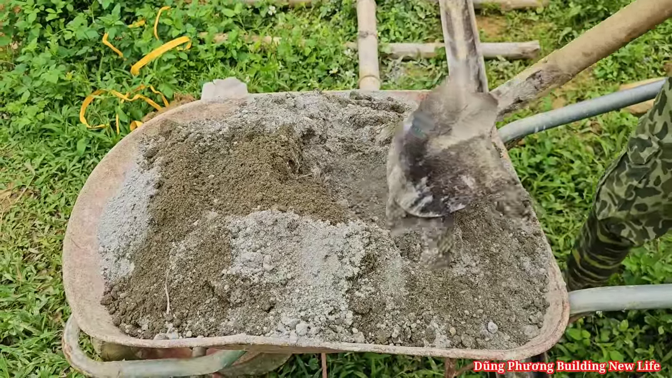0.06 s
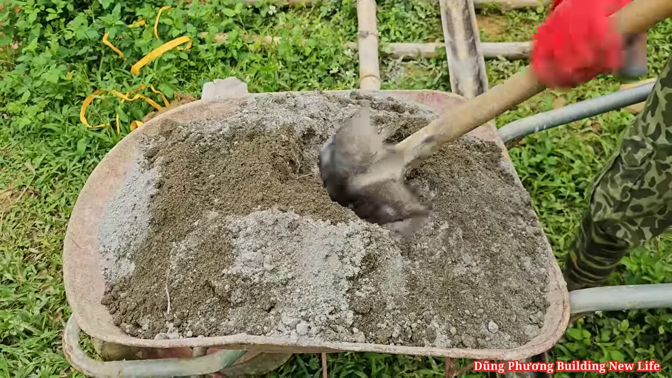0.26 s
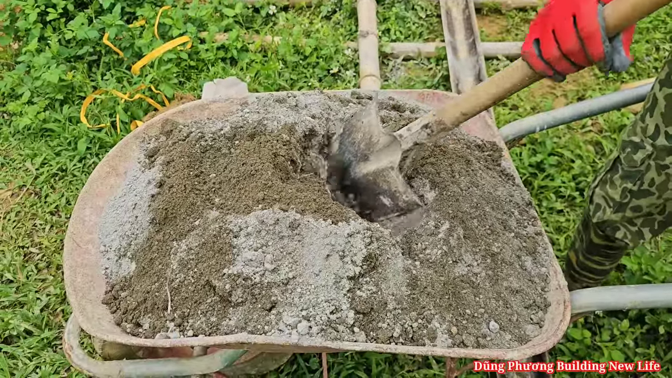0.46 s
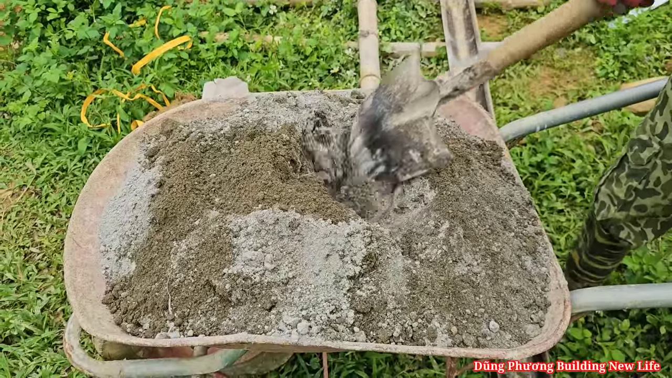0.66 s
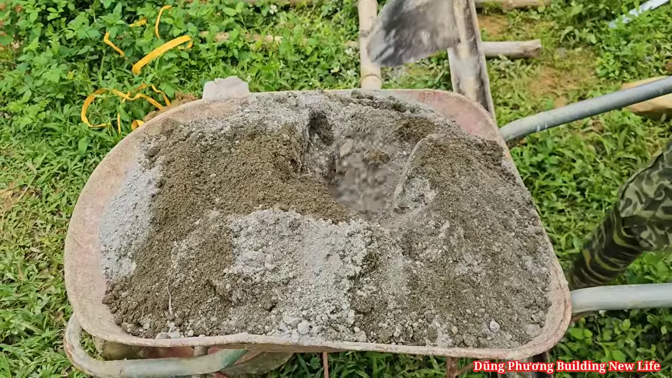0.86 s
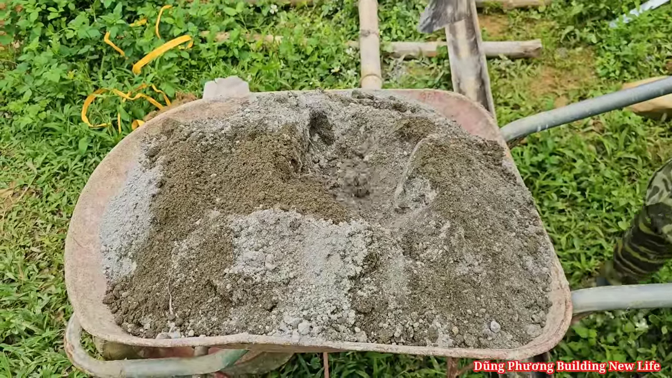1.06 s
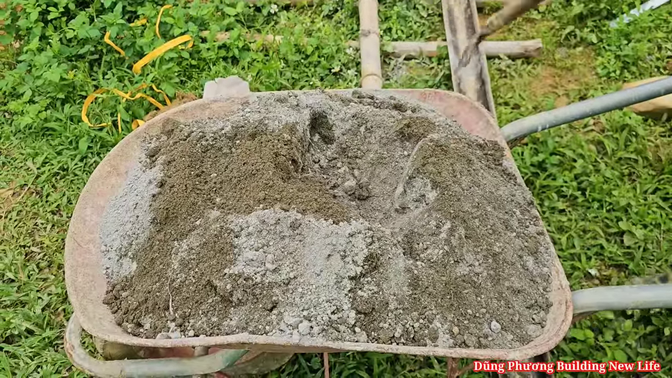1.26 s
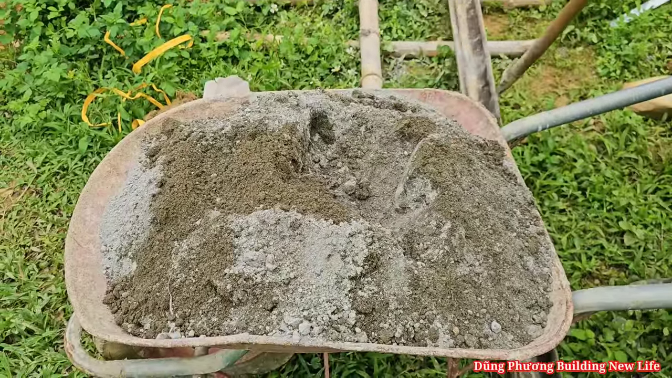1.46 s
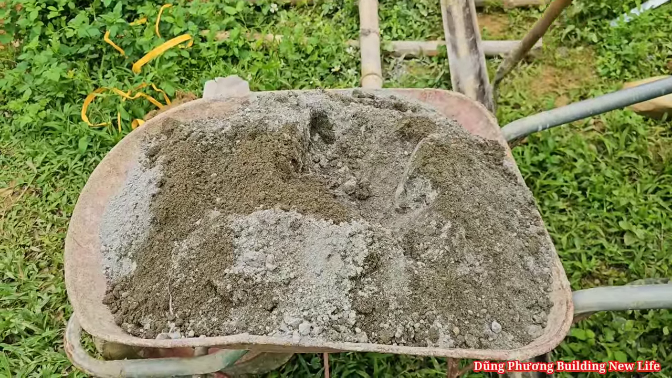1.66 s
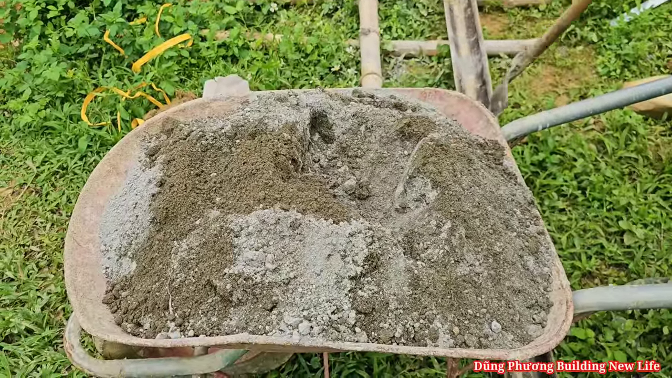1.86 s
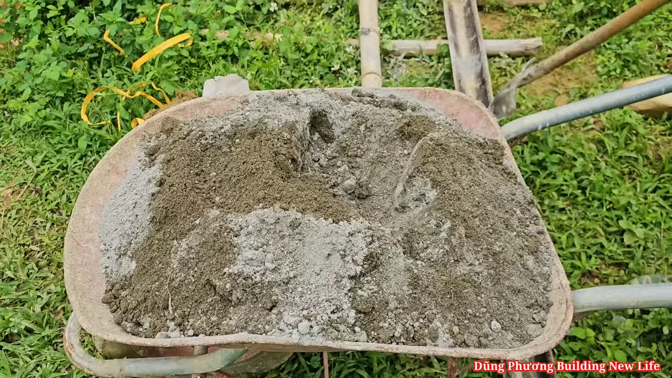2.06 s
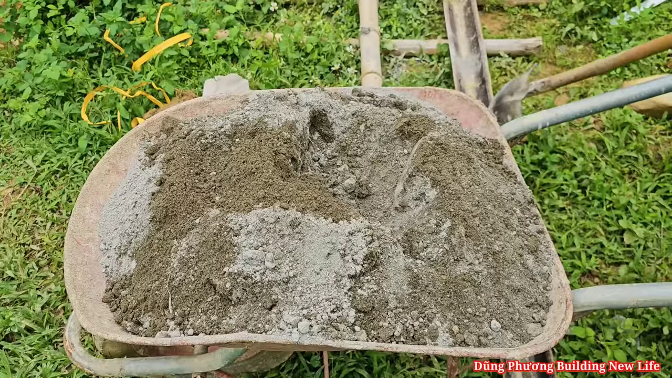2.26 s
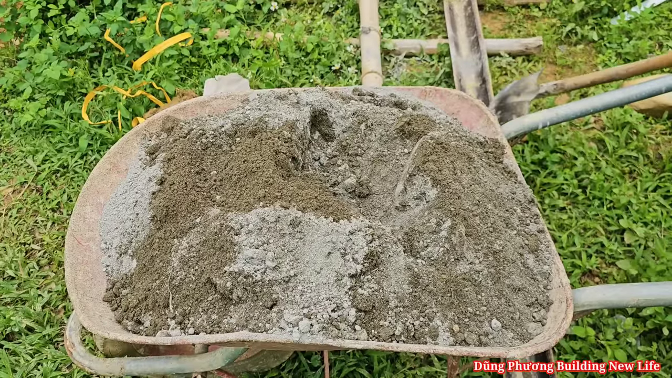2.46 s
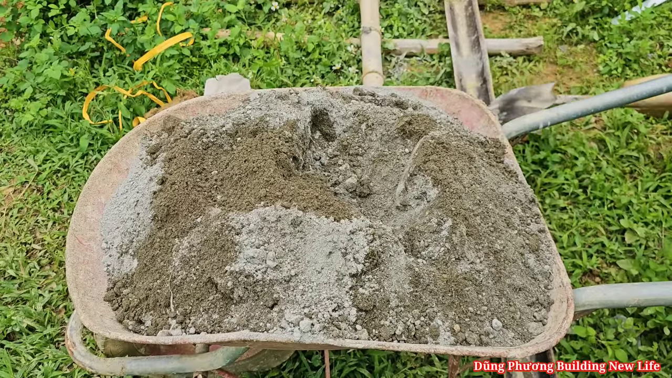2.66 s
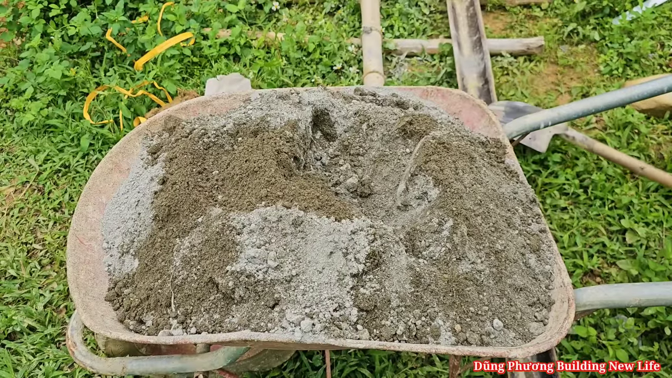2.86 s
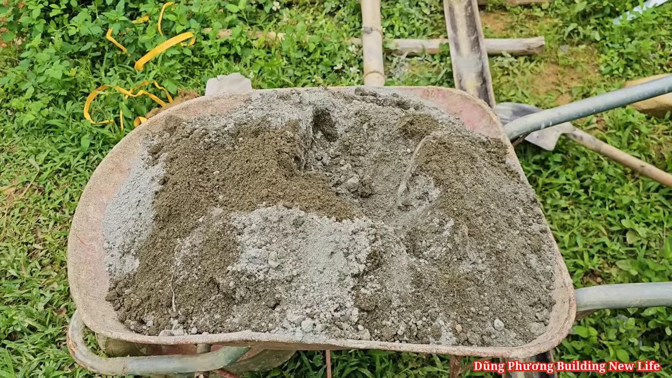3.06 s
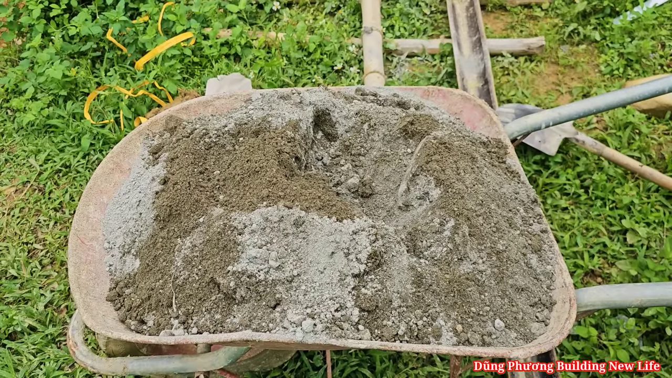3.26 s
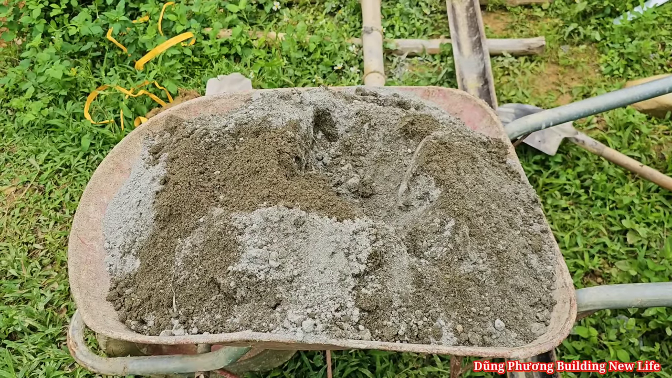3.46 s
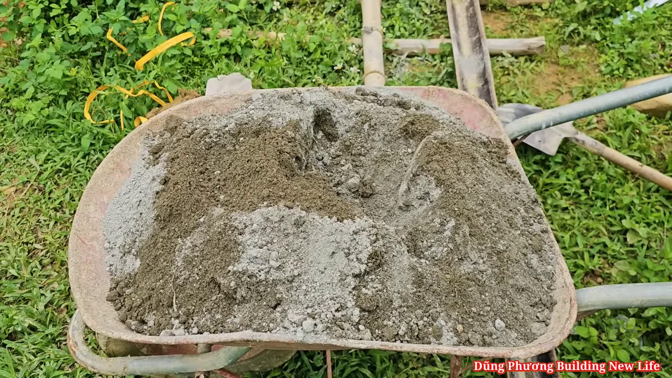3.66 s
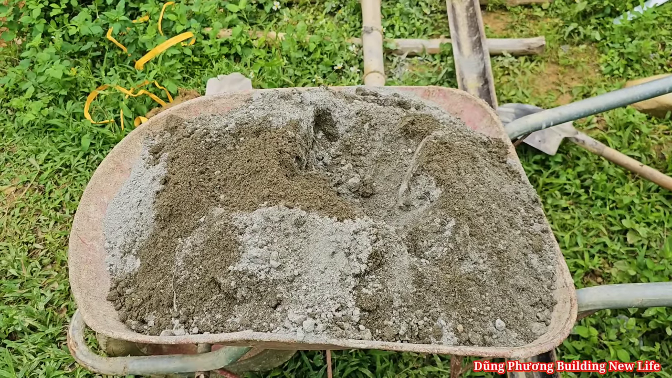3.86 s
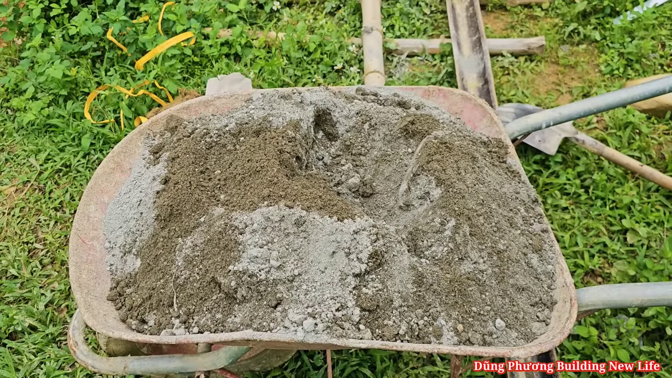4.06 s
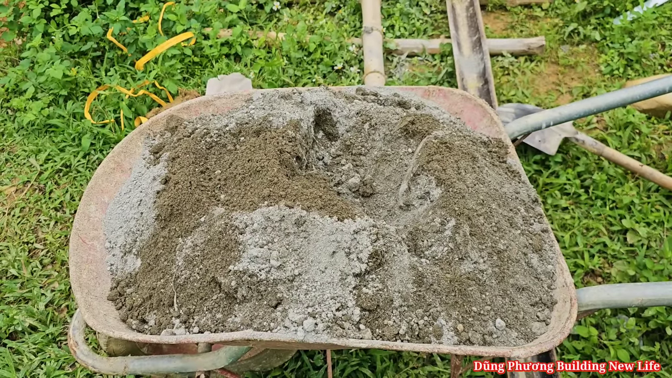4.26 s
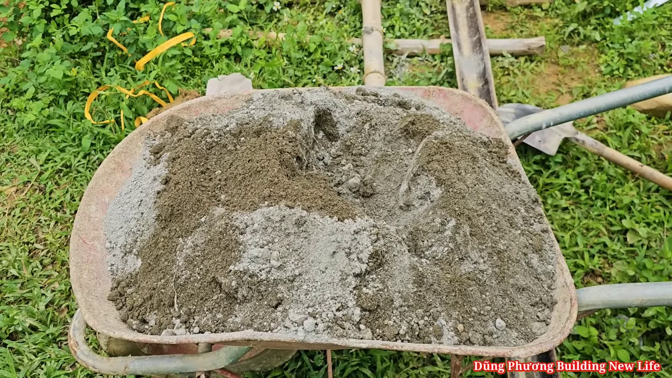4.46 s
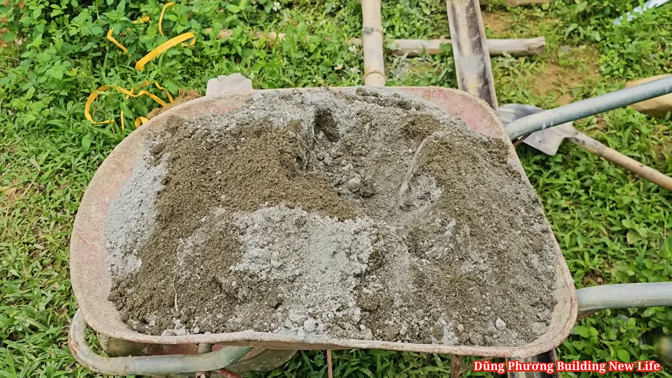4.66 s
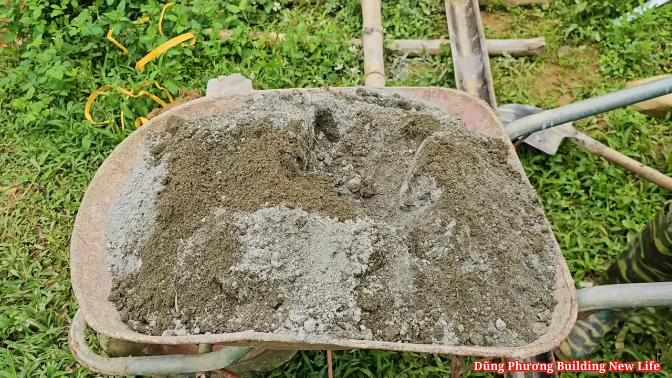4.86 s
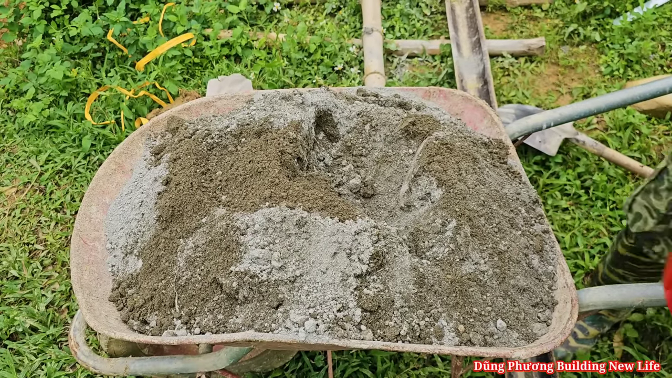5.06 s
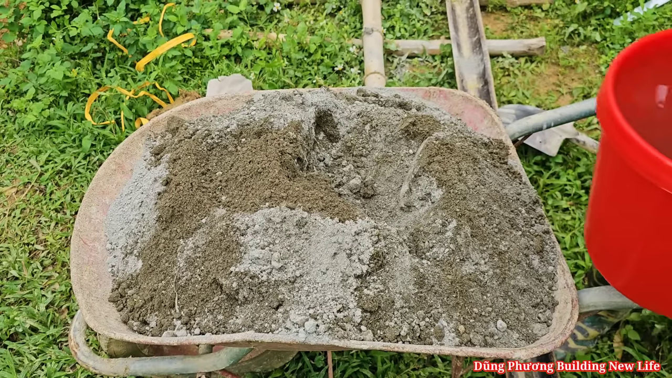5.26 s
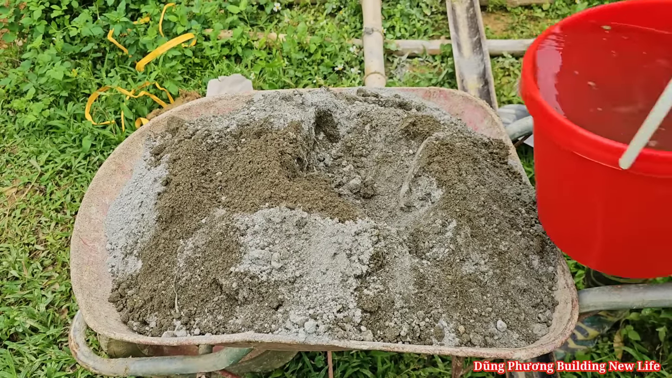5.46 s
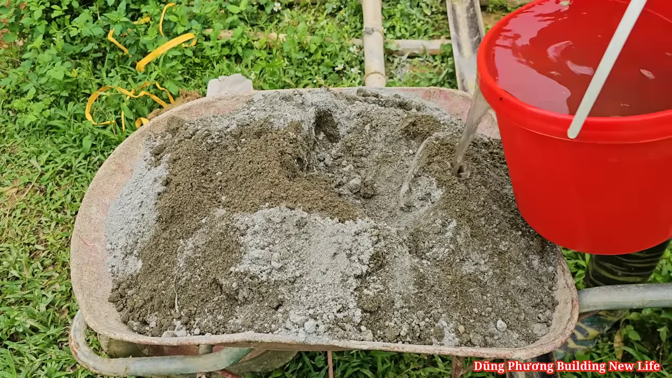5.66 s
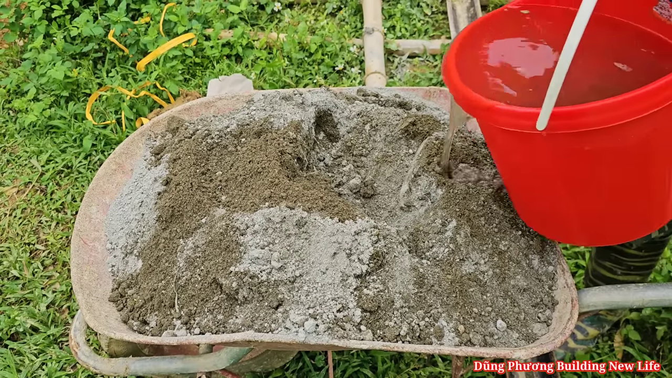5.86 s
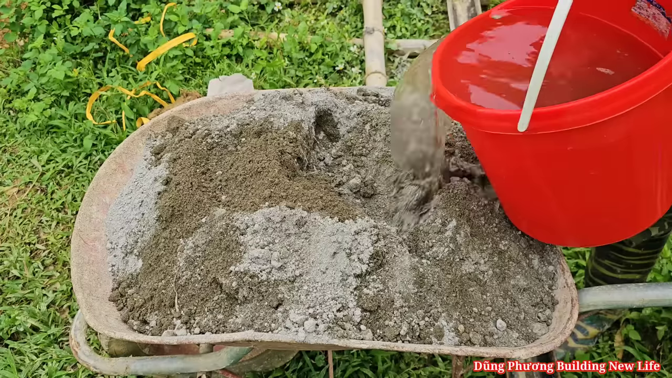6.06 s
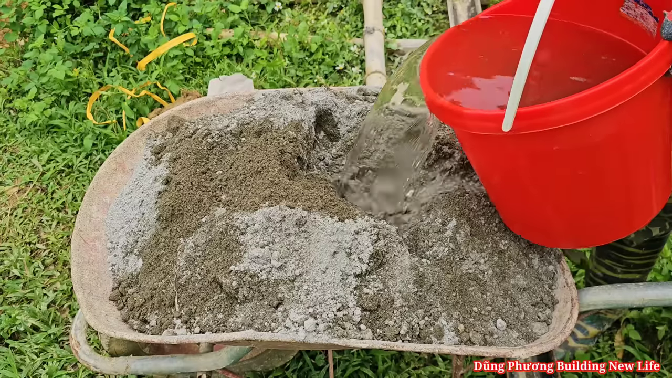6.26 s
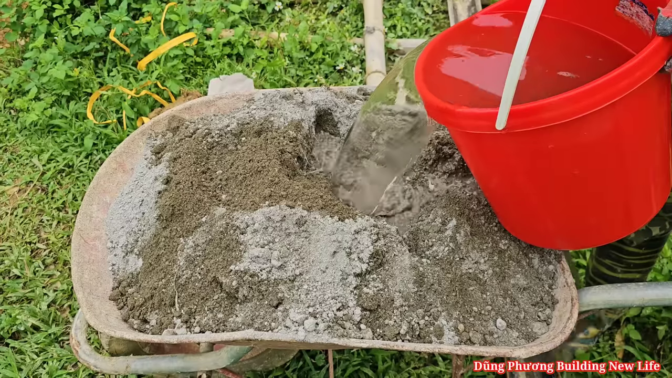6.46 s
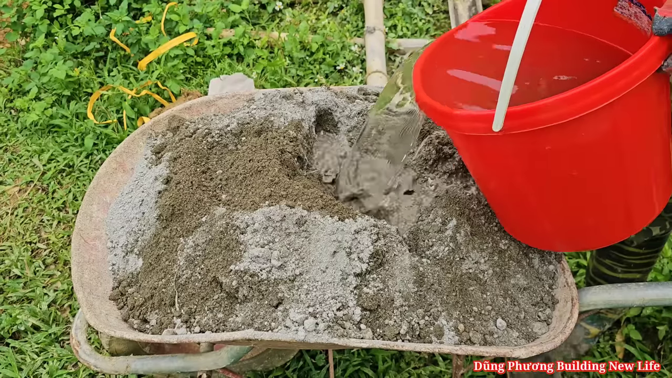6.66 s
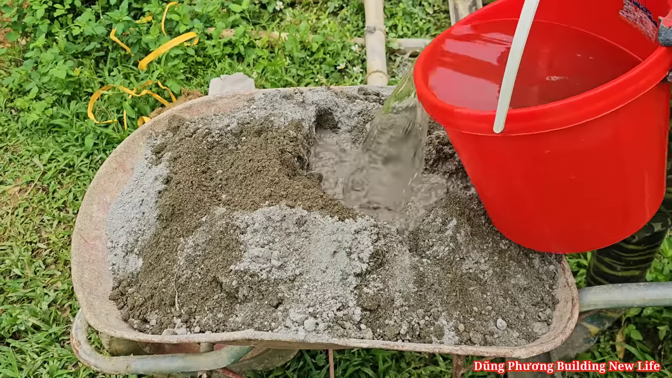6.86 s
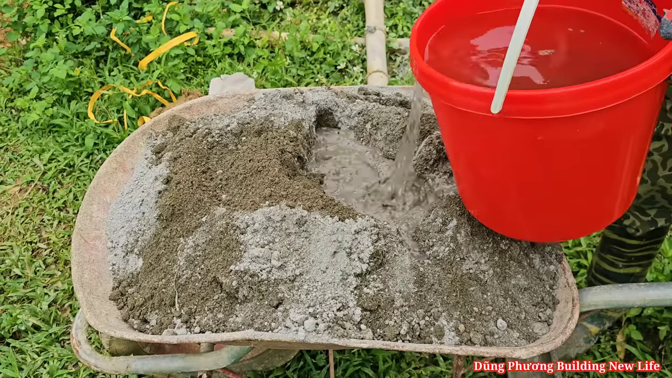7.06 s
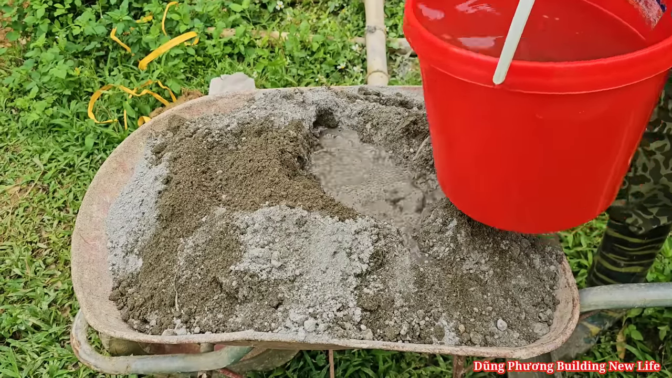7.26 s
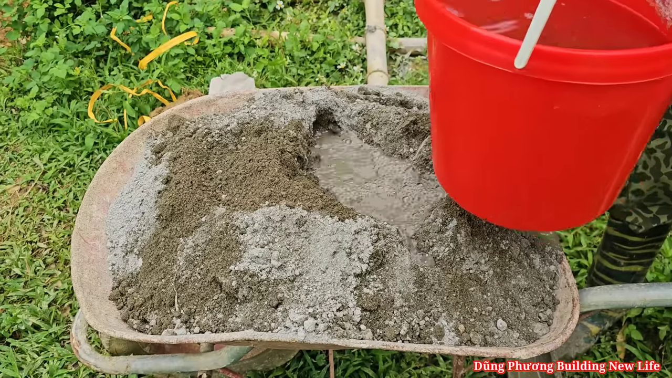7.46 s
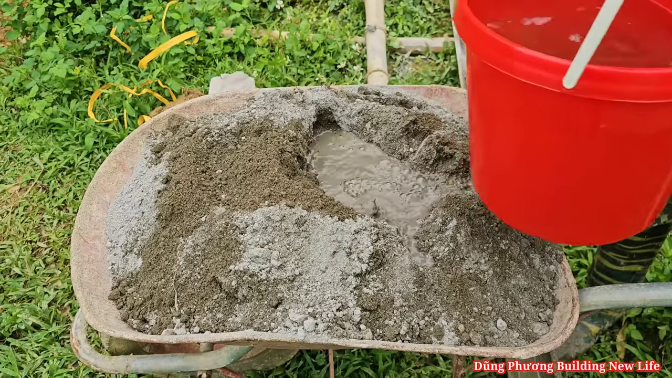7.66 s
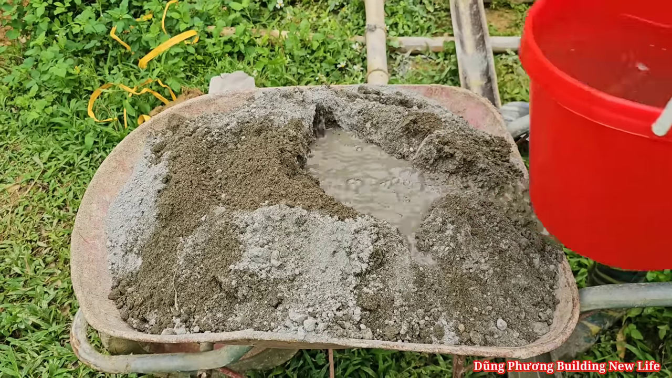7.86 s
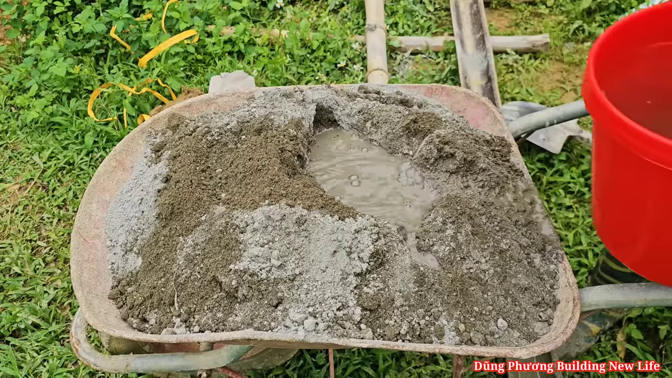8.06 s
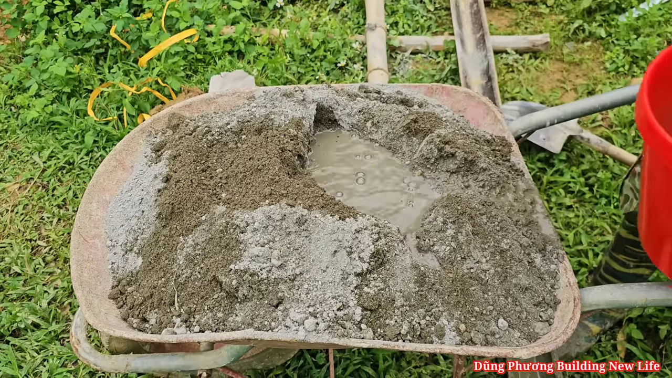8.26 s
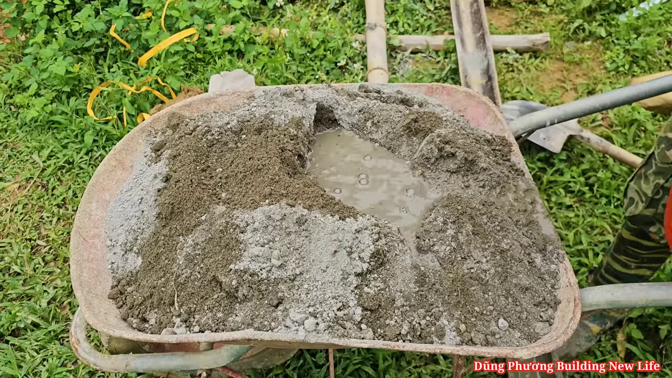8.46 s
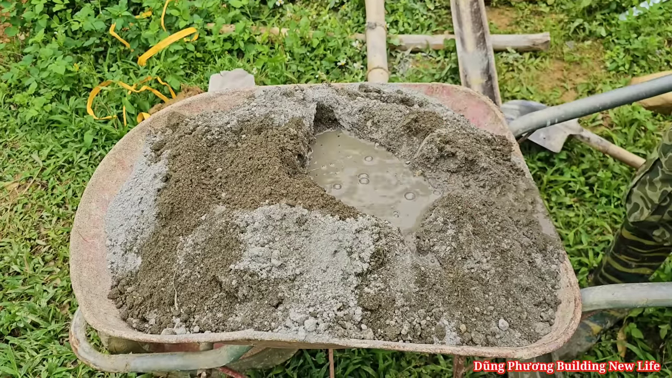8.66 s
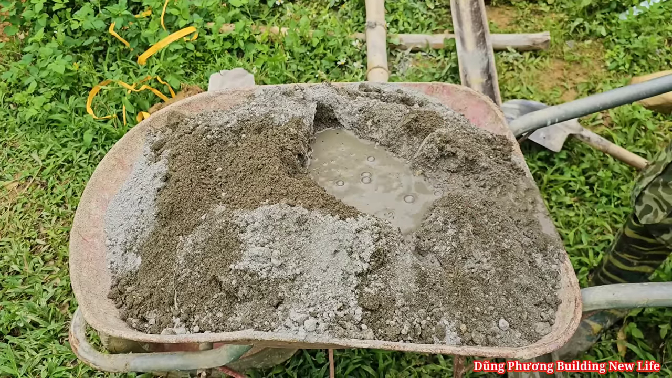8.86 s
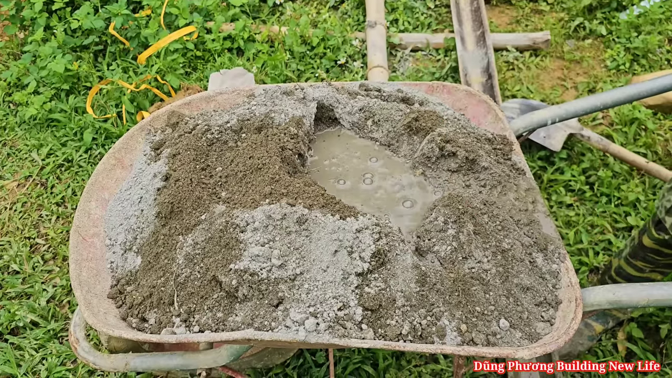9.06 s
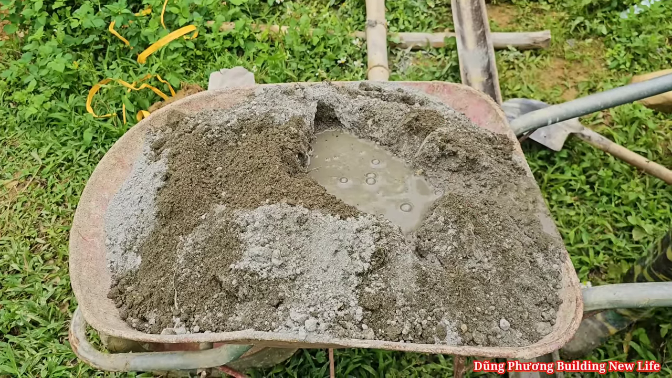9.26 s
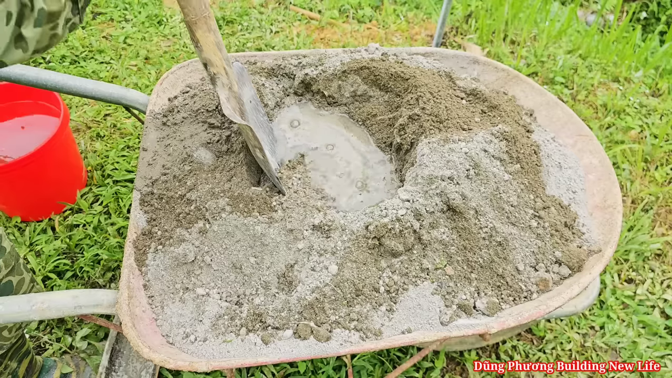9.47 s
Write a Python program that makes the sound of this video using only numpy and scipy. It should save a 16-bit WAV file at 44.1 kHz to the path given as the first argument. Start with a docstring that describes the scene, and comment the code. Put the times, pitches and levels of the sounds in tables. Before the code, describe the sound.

A shovel bites into dry sand, clangs and rattles down on poles, then a bucket of water splashes and gurgles onto sand amid cicadas.

```python
"""Shovel, sand and poured water

A steel shovel stabs dry sand in a barrow, is knocked and laid down rattling on poles: ringing modes, clacks, scrapes.
Feet shuffle in grass, a bucket is dragged up, water pours on the sand, then drips: shaped noise and damped sines.
Cicadas sing all round, a cricket chirps, a thin whistle sounds far off: noise bands and gliding sines.
A far motor hums and wind brushes the two ports: slowly varying noise bands.
"""
import sys
import numpy as np
from scipy import signal
from scipy.fft import rfft, irfft, next_fast_len
from scipy.io import wavfile
from scipy.ndimage import uniform_filter1d, map_coordinates

SR = 44100
rng = np.random.default_rng(int(sys.argv[2]) if len(sys.argv) > 2 else 0)


def output_pcm(signal):
    """Save a mono or channel-first signal as 16-bit PCM at the path in sys.argv[1].

    Samples are clipped to [-1, 1] before scaling.
    """
    pcm = np.clip(np.atleast_2d(signal).T, -1, 1) * 32767
    wavfile.write(sys.argv[1], SR, np.round(pcm).astype(np.int16))


N = 419391


def amp(db):
    """Decibels to linear gain."""
    return 10 ** (np.asarray(db) / 20)


def unit(x):
    """Scales x to rms 1."""
    return x / np.sqrt(np.mean(x ** 2) + 1e-20)


def along(points, hz):
    """Interpolates (Hz, value) points on a log frequency axis."""
    f, v = np.transpose(points)
    return np.interp(np.log(hz + 1), np.log(f + 1), v)


def curves(rows, **ends):
    """One value per sample for each column after the time."""
    s, *cols = np.transpose(rows)
    return [np.interp(np.arange(N) / SR, s, c, **ends) for c in cols]


def wobble(rate):
    """A smooth random curve, rate knots a second."""
    knots = rng.standard_normal(int(N * rate / SR) + 4)
    return map_coordinates(knots, [np.arange(N) * rate / SR])


def filtered(x, response):
    """x times a complex response of frequency."""
    m = next_fast_len(N + SR // 2)
    return irfft(rfft(x, m) * response(np.fft.rfftfreq(m, 1 / SR)), m)[..., :N]


def grains(depth_db, rate):
    """A lumpy gain whose loudness over 30 ms stays even."""
    gain = amp(depth_db * wobble(rate))
    return gain / np.sqrt(np.abs(uniform_filter1d(gain ** 2, size=1300)) + 1e-9)


def rush(spectrum, alike, patchy_db, grain_db):
    """Stereo noise of rms 1, patchy in time and colour, lumped into grains of some milliseconds."""
    z = signal.stft(rng.standard_normal((2, N)), nperseg=512)[2]
    field = uniform_filter1d(rng.standard_normal(z.shape[1:]), size=5, axis=0)
    field = uniform_filter1d(field, size=5, axis=1)
    pair = signal.istft(z * amp(patchy_db * unit(field)), nperseg=512)[1][:, :N]
    pair = pair * grains(grain_db, 400) * grains(grain_db, 100)

    def mid_side(hz):
        turn = np.arccos(np.clip(along(alike, hz), -1, 1)) / 2  # sets the left-right likeness
        return amp(along(spectrum, hz)) * [np.cos(turn), np.sin(turn)]

    mid, side = filtered(pair, mid_side)
    return unit(np.array([mid + side, mid - side]))


def add(track, s, sound):
    """Mixes a sound in at time s."""
    part = track[..., round(s * SR):][..., :sound.shape[-1]]
    part += sound[..., :part.shape[-1]]


def blip(hz, cycles, rise):
    """A damped sine of peak 1 whose pitch climbs by the share rise."""
    u = np.arange(int(5 * cycles * SR / hz)) * hz / SR / cycles  # time in decay constants
    x = np.sin(2 * np.pi * cycles * (u + rise * u * u / 10)) * np.exp(-u) * (1 - np.exp(-8 * u))
    return x / np.abs(x).max()


def burst(noise, s, t60, t):
    """A dying slice of noise with peak 1."""
    x = noise[round(s * SR):][:len(t)] * amp(-60 * t / t60) * (1 - np.exp(-t / 0.00058))
    return x / np.abs(x).max()


EDGE_DB, ROUND = 18.5, 1.44  # drop over one rise or fall; exponent: 1 peaked, 2 round


def swell(peak, rise, fall, db):
    """A gain that climbs to db at its peak and sinks again."""
    t = np.arange(N) / SR - peak
    return amp(db - EDGE_DB * np.minimum(np.abs(t / np.where(t < 0, rise, fall)), 9) ** ROUND)


def bubbles(track, span, band_hz, db, cycles, count):
    """A track with a cluster of chance bubbles."""
    out = np.zeros(N)
    for when, tone, size in rng.random((count, 3)):
        s, hz = np.interp(when, [0, 1], span), np.interp(tone, [0, 1], band_hz)
        add(out, s, amp(db - 7.7 * size) * blip(hz, cycles, rise=0.11))
    return track + out


# left-right likeness of far sound: (frequency [Hz], correlation [-1..1])
FAR_LIKENESS = [(60, .78), (150, 0.97), (380, 0.56), (950, -0.33), (6000, -0.25), (15000, .02)]
# spectra of motor hum, haze and wind: (frequency [Hz], density [dB])
HUM_SPECTRUM = [(95, -44), (112, -7.5), (121, 0.5), (130, -5), (150, -41.5)]
HAZE_SPECTRUM = [(15, -32), (25, -11), (120, -6.5), (384, -11.5), (531, -3), (1040, -8.5), (2280, -9),
                 (3620, -14.5), (4490, -1), (6920, -17.5), (9840, -25), (14000, -37.5), (16000, -34)]
WIND_SPECTRUM = [(8.8, -39), (15, -4.5), (38, -2), (60, -2.5), (118, -9), (200, -32), (260, -57.5),
                 (440, -120)]
# light air on the ports: (time [s], level [dB])
BREEZE = [(0, -94), (1.2, -92), (1.5, -87), (3, -87), (3.3, -74.5), (5.1, -73.5), (5.8, -87.5),
          (6.5, -78.5), (7.5, -78), (9.5, -73)]
# puffs of a gust: (peak time [s], rise [s], fall [s], level [dB])
GUST_PUFFS = [(7.77, 0.09, .03, -62), (7.95, 0.047, 0.12, -61), (8.65, .07, .2, -59),
              (8.758, .08, .06, -54), (8.85, 0.043, 0.042, -48), (9.06, 0.21, 0.15, -55),
              (9.26, 0.14, 0.046, -47.5), (9.33, 0.048, 0.058, -40.5), (9.5, .1, .1, -63)]


def open_air():
    """Far haze, a blurred motor hum, and wind lumps on each port."""
    hum = amp(-73.5) * rush(HUM_SPECTRUM, FAR_LIKENESS, patchy_db=-0.5, grain_db=-1.1)
    blowing = amp(curves(BREEZE)[0] + 3 * wobble(6.5)) + sum(swell(*puff) for puff in GUST_PUFFS)
    wind = blowing * rush(WIND_SPECTRUM, [(30, 0.54)], patchy_db=-0.5, grain_db=1.5)
    haze = amp(-61.0) * rush(HAZE_SPECTRUM, FAR_LIKENESS, patchy_db=2.0, grain_db=-0.8)
    return hum + wind + haze


# cicada chorus: (time [s], level [dB])
CHORUS = [(0, -62.5), (.48, -53), (1.32, -58), (1.9, -62), (2.3, -55), (2.94, -55.5), (3.3, -60),
          (3.73, -59.5), (4.08, -55), (5.75, -55.5), (6.22, -50), (6.67, -61), (7.31, -55.5), (8.37, -55.5),
          (8.82, -66), (9.4, -54)]
# chorus spectrum: (frequency [Hz], density [dB])
CHORUS_SPECTRUM = [(2180, -46.5), (3700, -14.5), (3970, -16), (4200, -5), (4450, 4.5), (6000, -20),
                   (7800, -56), (13200, -120)]
# one cicada winding up: (time [s], start pitch [Hz], end pitch [Hz], climb [s], level [dB])
WINDUPS = [(1.95, 3500, 4400, 0.19, -55.5), (3.65, 3530, 4350, .45, -58.5), (8.95, 3570, 4360, 0.33, -54)]
# cricket chirps: (time [s], pulses [count], mean pitch [Hz], level [dB])
CHIRPS = [(7.65, 3, 3560, -64), (8.005, 5, 3560, -57), (8.4, 6, 3570, -55), (8.78, 6, 3570, -57),
          (9.16, 3, 3700, -60), (9.275, 3, 3570, -61)]
# thin far whistle: (time [s], mean pitch [Hz], mean level [dB])
WHISTLE = [(8.5, 763, -77), (8.62, 766, -72), (9, 756, -66.5), (9.2, 740, -71)]
CHIRP_PULSES_PER_S = 47


def insects():
    """A blurred chorus, a soloist whose band climbs as it starts, cricket chirps and a thin whistle."""
    t = np.arange(N) / SR
    out = amp(curves(CHORUS)[0]) * rush(CHORUS_SPECTRUM, FAR_LIKENESS, patchy_db=0.5, grain_db=-0.5)
    for s, start_hz, end_hz, climb_s, db in WINDUPS:
        u = np.clip((t - s) / climb_s, 0, None)
        hz = end_hz - (end_hz - start_hz) * np.exp(-2 * u)
        blur = np.array([wobble(350), wobble(350)])
        envelope = np.minimum(4 * u, 1) * np.exp(-u / 1.6)
        out += amp(db) * envelope * blur * np.sin(2 * np.pi * np.cumsum(hz) / SR)
    for s, pulses, hz, db in CHIRPS:
        stroke = np.arange(0, pulses, CHIRP_PULSES_PER_S / SR)
        falling_hz = hz * (1.05 - .1 * (stroke % 1))
        pulse = np.sin(np.pi * np.minimum(stroke % 1 / .7, 1)) ** 2
        envelope = np.minimum(.5 + stroke / 4, 1) * pulse
        phase = 2 * np.pi * np.cumsum(falling_hz) / SR + [[0], [.8]]  # left, right
        add(out, s, amp(db) * envelope * np.sin(phase))
    hz, db = curves(WHISTLE)
    turn = 2 * np.pi * np.cumsum(hz + 4 * wobble(30)) / SR
    on = (t > WHISTLE[0][0]) & (t < WHISTLE[-1][0])
    return out + on * amp(db + 2.1 * wobble(25)) * (0.55 * np.sin(turn) + np.sin(2 * turn))


# left-right likeness of near sound: (frequency [Hz], correlation [-1..1])
NEAR_LIKENESS = [(60, 1), (400, 0.95), (950, .8), (2400, 0.34), (6000, .17), (15000, .02)]
# moves that trickle sand and tread grass: (peak time [s], rise [s], fall [s], grit [dB], grass [dB])
MOVES = [(.52, 0.44, 0.44, -60.5, -60.5), (1.08, 0.11, 0.19, -53.5, -72), (1.3, 0.28, 0.26, -43.5, -67.5),
         (1.72, 0.28, 0.61, -63, -57.5), (2.302, .15, 0.29, -55, -63.5), (2.935, .06, .05, -45, -59),
         (3.15, 0.11, .15, -63.5, -51.5), (4.1, 0.27, 0.17, -67, -70), (4.47, .12, 0.1, -65.5, -48),
         (4.82, 0.25, 0.19, -49.5, -52.5), (5.05, 0.22, 0.21, -77, -66), (5.299, 0.27, 0.093, -49.5, -53.5),
         (7.45, 0.098, 0.29, -70.5, -82.5), (8.88, 0.16, 0.17, -59.5, -63.5),
         (9.36, 0.32, .2, -59.5, -60.5)]
# blade driven into sand: (time [s], length [s], level [dB], low push re level [dB])
STABS = [(0.241, 0.009, -43.5, -28), (0.291, 0.015, -44.5, -37), (0.302, 0.059, -21.5, -12),
         (0.38, 0.016, -47, -5), (0.589, 0.024, -39, -19.5), (0.408, 0.0044, -58, -8),
         (0.621, 0.09, -47.5, -27), (0.699, 0.027, -48, -5.5)]
# spectra of bite, push, fine grit, coarse grit, grass: (frequency [Hz], density [dB])
BITE_SPECTRUM = [(500, -19), (1000, -9), (1400, -1), (2000, -6), (3800, 2.5), (8000, -6), (11800, -1),
                 (16000, 3)]
PUSH_SPECTRUM = [(25, -45), (60, -3), (270, -2), (600, -6.5), (1000, -4), (1500, -15.5)]
FINE_SPECTRUM = [(4000, -25.5), (5500, -3), (7000, -7.5), (9000, -4), (11700, -2), (13600, -5),
                 (16000, -4.5)]
COARSE_SPECTRUM = [(700, -38.5), (1200, -4), (2200, -4.5), (4200, 5), (6000, -8.5), (8000, -46)]
GRASS_SPECTRUM = [(80, -31), (200, -7), (300, -2), (520, -1.5), (750, -12), (1100, -6.5), (1500, -14.5)]
STILL_DB = (-80.5, -66.5, -65.5)  # fine, coarse, grass at rest
COARSE_DB, COARSE_SHARE = -58.5, 0.55  # coarse level when fine grit is at -49 dB; its dB per dB


def sand():
    """Stabs crunch for their length; grit and grass rustle under every move."""
    fine, coarse, grass = amp(STILL_DB)
    for *shape, grit_db, grass_db in MOVES:
        fine = fine + swell(*shape, grit_db)
        coarse = coarse + swell(*shape, COARSE_DB + COARSE_SHARE * (grit_db + 49))
        grass = grass + swell(*shape, grass_db)
    bite, shove = np.zeros(N), np.zeros(N)
    for s, length_s, db, push_db in STABS:
        u = np.arange(round(length_s * SR)) / (length_s * SR)
        add(bite, s, amp(db) * np.minimum(6 * u, 1) * (1 - u ** 6))
        add(shove, s + 0.23 * length_s, amp(db + push_db) * np.sin(np.pi * u))  # the heap yields late
    return (bite * rush(BITE_SPECTRUM, NEAR_LIKENESS, patchy_db=-1.5, grain_db=1.5)
            + shove * rush(PUSH_SPECTRUM, NEAR_LIKENESS, patchy_db=1.5, grain_db=-0.5)
            + fine * rush(FINE_SPECTRUM, NEAR_LIKENESS, patchy_db=1.5, grain_db=1.0)
            + coarse * rush(COARSE_SPECTRUM, NEAR_LIKENESS, patchy_db=3.5, grain_db=1.5)
            + grass * rush(GRASS_SPECTRUM, FAR_LIKENESS, patchy_db=5.0, grain_db=1.5))


# dull bumps of bucket and boots: (time [s], level [dB], pitch [Hz])
BUMPS = [(2.094, -44, 482), (2.371, -45, 441), (3.626, -46.5, 554), (4.374, -46, 536), (4.445, -37.5, 280),
         (4.472, -32, 500), (4.487, -28.5, 501), (4.502, -36, 307), (4.524, -29.5, 317), (4.535, -35, 306),
         (4.57, -19.5, 397), (4.578, -33, 409), (4.702, -44.5, 458), (5.282, -39, 344), (5.31, -47.5, 296)]
# grit ticks and drips: (time [s], level [dB], start pitch [Hz], decay [cycles])
TICKS = [(.141, -57, 3260, 2.2), (.413, -46, 3500, 1.5), (.737, -38, 3000, 1.5), (.797, -42, 3120, 1.5),
         (.82, -43, 3360, 1), (1.32, -44, 1290, 2.4), (1.649, -29, 2800, 1.2), (1.895, -44, 2900, 3.2),
         (7.594, -39.5, 2330, 4), (7.77, -56, 1530, 8), (7.865, -46.5, 2450, 7.8), (8.537, -37.5, 5130, 2),
         (8.624, -43.5, 2750, 4), (8.86, -44, 1880, 2.5), (9.425, -49, 1750, 7)]
BUMP_CYCLES = 0.7
SOAK_S, SOAK_HZ, SOAK_DB = (7.45, 8.75), (513, 647), -58  # bubbles leave the wet sand


def small_hits():
    """Bumps are one low swing; ticks are drops and grit with a short pitch; soaking water lets out faint bubbles."""
    out, padding = np.zeros(N), np.hanning(24) / 11.5
    for s, db, hz in BUMPS:
        padded = np.convolve(blip(hz, BUMP_CYCLES, rise=0), padding)  # a soft contact
        add(out, s + 0.0021, -amp(db) * padded)
    for s, db, hz, cycles in TICKS:
        add(out, s, amp(db) * blip(hz, cycles, rise=0.067))
    return bubbles(out, SOAK_S, SOAK_HZ, SOAK_DB, cycles=7.2, count=10)


# blows on the shovel: (time [s], ring level [dB], crack level [dB], hardness [dB/octave], blade state)
KNOCKS = [(1.455, -10, -22, 3, "held"), (1.464, -8, -43, -5, "held"), (1.497, -28, -49, -12, "held"),
          (1.544, -32, -59.5, 0, "held"), (1.603, -43, -60, 12, "held"), (1.733, -47, -54, -2, "held"),
          (2.844, -41.5, -41, 5.5, "free"), (2.865, -40, -38, 9.5, "free"),
          (2.932, -16.5, -32.5, 5.5, "free"), (2.943, -5.5, -20, 7, "free"),
          (2.958, -18.5, -36.5, 0.5, "free"), (3.061, -8.5, -30, -0.5, "free"),
          (3.063, -11, -39, 4, "free"), (3.098, -15, -36, 6, "free"), (3.134, -27, -55, 11, "free"),
          (3.157, -19, -50, -12, "free"), (3.198, -12.5, -58, -2.5, "free"), (3.235, -23, -56, 2.2, "free"),
          (3.247, -18, -46, -2, "free"), (3.291, -36, -50, -15, "free"), (3.41, -46.5, -63, -0.5, "free"),
          (4.882, -10.5, -32.5, 1.5, "lying"), (4.887, -7.5, -45, -3, "lying")]
SETTLES_S = [3.172, 3.325]  # the blade settles flat
HUSH_DB_PER_S = 601.5


def choke():
    """The gain of the ring: it sinks from each settling until the next blow."""
    t, gain = np.arange(N) / SR, np.ones(N)
    for s in SETTLES_S:
        until = min(k[0] for k in KNOCKS if k[0] > s) - .002
        sinking = amp(-HUSH_DB_PER_S * np.clip(t - s, 0, 1))
        gain = np.where((t > s) & (t < until), sinking, gain)
    return gain


# ringing modes of the shovel: (frequency [Hz], width [Hz], level [dB])
SHOVEL_MODES = [(160, 40, -20), (265, 30, -13), (301, 12, -7), (393, 16, -16), (441, 12, -3), (560, 16, 2),
                (668, 40, -19), (716, 28, -17), (769, 35, -17), (840, 15, -7), (917, 40, -9),
                (955, 35, -13), (1082, 22, -5), (1253, 22, -8), (1325, 28, -12), (1418, 11, -4),
                (1594, 22, -14), (1840, 20, -19), (2066, 22, -16), (2290, 40, -19), (2384, 14, -12),
                (2860, 40, -30), (3160, 25, -25), (3320, 25, -26), (3630, 60, -29), (3850, 27, -29),
                (4450, 45, -31)]
# what a blow adds, by blade state: (thud re ring [dB], handle knock re ring [dB], clack re ring [dB],
# ground boom re ring [dB], muffling as added width at 1 kHz [Hz])
BLADE_STATES = {"held": (-8.5, -7.5, -3.5, -28, 3.5), "free": (-17.5, -12, -9, -37.5, 6),
                "lying": (-22, -7, -10.5, -45, 10)}
# blade scraping along its rest: (peak time [s], rise [s], fall [s], level [dB], hardness [dB])
SCRAPES = [(1.5, 0.026, 0.17, -44, -2.5), (2.9, 0.087, .03, -54.5, 6.5), (2.945, .02, 0.05, -18, 1),
           (3.062, .004, 0.042, -18.5, -3), (3.139, 0.027, 0.038, -16, 0),
           (3.213, 0.073, 0.076, -29.5, 5.5), (9.22, 0.13, 0.11, -58.5, 10)]
# spectra of dry clack and bright crack: (frequency [Hz], density [dB])
CLACK_SPECTRUM = [(100, -26.5), (250, -14.5), (600, -1), (1400, 0.5), (2500, -9), (4000, -7.5), (6500, -37),
                  (9000, -43.5)]
CRACK_SPECTRUM = [(1500, -37), (3000, -3), (5000, -4.5), (9000, -11.5), (11000, -9), (16000, -16.5)]
HISS_DB = -7.5  # hissing treble onset of a crack, re crack
GRIPPED_HZ, GRIP_WIDENS_HZ = 560, 24.8  # hand or grass chokes this mode unless the blade is free


def struck_ring(t, hard_db, state, chance):
    """Decaying modes: hard contact favours the high ones, chance strengths stand for the spot struck."""
    muffle_hz = abs(BLADE_STATES[state][-1])
    ring = np.zeros(len(t))
    for (hz, width, level), luck in zip(SHOVEL_MODES, chance):
        start = amp(level + 2 * luck + hard_db * np.log2(hz / 700))
        grip = GRIP_WIDENS_HZ * (hz == GRIPPED_HZ and state != "free")
        damping = muffle_hz * (hz / 1000) ** 2 + grip
        ring += start * width * np.exp(-np.pi * (width + damping) * t) * np.sin(2 * np.pi * hz * t)
    return ring * (1 - np.exp(-t / 0.0013)) / np.abs(ring).max()


def mode_response(f):
    """Resonances of the shovel in alternating sign."""
    return sum((-1) ** k * amp(db) * 1j * f * width / (hz * hz - f * f + 1j * f * width)
               for k, (hz, width, db) in enumerate(SHOVEL_MODES))


def shovel():
    """Blows ring each mode at a new strength over a dry clack; scraping keeps the modes fed with grit."""
    out, rings, t = np.zeros(N), np.zeros(N), np.arange(SR // 2) / SR
    chances = rng.standard_normal((len(KNOCKS), len(SHOVEL_MODES)))
    clacks, sparks = (rush(shape, [(100, 1.0)], patchy_db=7.0, grain_db=0.94)[0]
                      for shape in (CLACK_SPECTRUM, CRACK_SPECTRUM))
    hiss = np.diff(rng.standard_normal(N + 1))  # differencing tilts it to the treble
    for (s, db, crack_db, hard_db, state), chance in zip(KNOCKS, chances):
        thud_db, handle_db, clack_db, boom_db, _ = BLADE_STATES[state]
        s -= .002  # contact begins just before the peak
        add(rings, s, amp(db) * struck_ring(t, hard_db, state, chance))
        add(out, s, -amp(db + thud_db) * blip(290, cycles=1.4, rise=0))
        add(out, s, amp(db + boom_db) * blip(89, cycles=1.1, rise=0))
        add(out, s, amp(db + handle_db) * blip(1060, cycles=2.5, rise=0))
        crack = burst(sparks, s, 0.049, t) + amp(HISS_DB) * burst(hiss, s, .012, t)
        add(out, s, amp(crack_db) * crack)
        add(out, s, amp(db + clack_db) * burst(clacks, s, .045, t))
    grit = rng.standard_normal(N) * grains(1.9, 250)
    norm = np.std(filtered(grit, mode_response))
    soft = filtered(grit, lambda f: 1 / (1 + (f / 750) ** 4))
    fed = np.zeros(N)
    for *shape, hard_db in SCRAPES:
        gain = swell(*shape)
        fed += gain * (soft * amp(-hard_db) + (grit - soft) * amp(hard_db))
        out += gain * (amp(-13.0) * clacks + amp(-34.5 + 1.2 * hard_db) * sparks)
    return out + choke() * (rings + filtered(fed, mode_response) / norm)


# spray spectrum: (frequency [Hz], density [dB])
SPRAY_SPECTRUM = [(3000, -25.5), (5000, -1), (5650, -3.5), (7000, -6.5), (10000, -8), (14000, -5),
                  (16000, -2.5)]
DROPLETS_PER_S, DROPLET_DB = 510, -1.5  # fine drops bursting in the spray; level re spray


def droplets():
    """Sparse clicks of scattered size in the colour of the spray, rms 1."""
    sizes = amp(3.2 * rng.exponential(size=(2, N)))
    clicks = (rng.random((2, N)) < DROPLETS_PER_S / SR) * sizes
    return unit(filtered(clicks, lambda hz: amp(along(SPRAY_SPECTRUM, hz))))


# poured stream: (time [s], spray [dB], splash [dB], gurgle [dB])
POUR = [(5.601, -74, -83, -80), (5.68, -57, -74, -87), (5.77, -51.5, -49.5, -66), (5.9, -53.5, -59.5, -91),
        (6.015, -55.5, -50, -63), (6.035, -48, -43.5, -71), (6.26, -43.5, -40.5, -45.5),
        (6.4, -49.5, -45, -51.5), (6.5, -42.5, -40, -42.5), (6.515, -38.5, -39.5, -31.5),
        (6.65, -38.5, -41, -42.5), (6.86, -37, -41.5, -48), (6.91, -50.5, -51, -53),
        (7.09, -50.5, -41.5, -55), (7.16, -53.5, -49.5, -60), (7.4, -65, -68.5, -85)]
# loudest splats: (time [s], nominal level [dB], start pitch [Hz])
SPLATS = [(5.663, -42, 3080), (5.705, -46, 2860), (5.736, -36, 3350), (5.764, -34, 3550),
          (5.827, -41, 3800), (5.889, -29, 3820), (5.92, -35, 3600), (5.986, -27, 3640), (6.022, -30, 2200),
          (6.065, -25, 1800), (6.097, -27, 2020), (6.14, -27, 1990), (6.293, -30, 920), (6.323, -20, 3950),
          (6.416, -32, 1610), (6.494, -22.5, 2900), (6.508, -19, 1160), (6.781, -24, 2880),
          (6.852, -25, 3282), (7.185, -22, 2050), (7.208, -16, 3900), (7.272, -28.5, 3620),
          (7.293, -40, 2210)]
# spectra of splash and gurgle: (frequency [Hz], density [dB])
SPLASH_SPECTRUM = [(800, -19), (1300, -5.5), (1700, -8.5), (2150, 0), (2800, -3.5), (4500, 1), (6500, -7),
                   (8000, -33)]
GURGLE_SPECTRUM = [(59, -59), (100, -15), (134, -15), (172, -13.5), (336, -12.5), (523, 1), (671, -18),
                   (1010, -2.5), (1500, -10), (1950, -47.5), (3300, -120)]
SURGE_DB = 1.27  # the stream wavers
LAST_SLOP = (7.22, 0.025, 0.015, -33.5)  # the bucket tips back: peak s, rise s, fall s, level dB
# the stream's head slaps a shallow pool into bubbles
FIRST_POOL_S, FIRST_POOL_HZ, FIRST_POOL_DB = (6.02, 6.17), (1070, 3000), -37
SMALL_SPLAT_DB, MIST_DB = 11, -45  # least chance splat re splash; mist of any splat


def water():
    """Spray, splash and gurgle follow the wavering stream; bubbles and splats sit on top."""
    surge, slop = amp(SURGE_DB * wobble(22)), swell(*LAST_SLOP)
    stream = amp(curves(POUR, left=-120, right=-120)) * surge
    spray, splash, gurgle = stream + amp([[-2.5], [0], [-17]]) * slop
    spray_noise = rush(SPRAY_SPECTRUM, NEAR_LIKENESS, patchy_db=3.0, grain_db=3.0)
    flow = (spray * (spray_noise + amp(DROPLET_DB) * droplets())
            + splash * rush(SPLASH_SPECTRUM, NEAR_LIKENESS, patchy_db=2.5, grain_db=2.0)
            + gurgle * rush(GURGLE_SPECTRUM, NEAR_LIKENESS, patchy_db=-1.5, grain_db=3.5))
    low, high, splats = np.zeros(N), np.zeros(N), np.zeros((2, N))
    start, length = POUR[0][0], POUR[-1][0] - POUR[0][0]
    for when, tone, size in rng.random((520, 3)):
        hz = 400 * 9 ** tone
        bubble = amp(-14 * size) * blip(hz, cycles=3.4, rise=0.29)
        add(low if tone < .5 else high, start + when * length, bubble)
    chance_splats = []
    for when, tone, size in rng.random((30, 3)):
        s = start + when * length
        splash_db = 20 * np.log10(splash[round(s * SR)])
        chance_splats.append((s, splash_db + SMALL_SPLAT_DB + 8 * size, 950 * 4 ** tone))
    t = np.arange(SR // 40) / SR
    for s, db, hz in SPLATS + chance_splats:
        s -= .0015
        add(splats, s, amp(db - 6) * blip(hz, cycles=2.5, rise=.2)[None])
        add(splats, s, amp(MIST_DB - 60 * t / 0.013) * rng.standard_normal((2, len(t))))
    flow = bubbles(flow, FIRST_POOL_S, FIRST_POOL_HZ, FIRST_POOL_DB, cycles=3.9, count=18)
    return flow + splats + amp(-7.0) * gurgle * low + amp(2.0) * splash * high


# decay of the scattered sound: (frequency [Hz], t60 [s])
YARD_DECAY = [(100, 0.6), (500, 0.21), (2000, .1), (10000, 0.0064)]


def yard(x):
    """Ground and barrow scatter the sound; each frequency dies at its own speed."""
    hz, t, z = signal.stft(rng.standard_normal((2, SR // 2)), SR, nperseg=256)
    decay = amp(-60 * t / along(YARD_DECAY, hz)[:, None])
    tail = signal.istft(z * decay, SR, nperseg=256)[1]
    tail = tail / np.linalg.norm(tail[0])
    delayed = np.pad(x, (120, 0))[None]
    return signal.fftconvolve(delayed, tail, axes=1)[:, :N]


def scene():
    """Hard sounds reach the right port a little first; the rest arrives already in stereo."""
    hits = shovel() + small_hits()
    hits = filtered(hits, lambda hz: (1j * hz / (45 + 1j * hz)) ** 2)  # small bodies shed no deep bass
    lag_s = .00015
    sides = np.array([[1], [-1]])
    direct = filtered(hits, lambda hz: np.exp(-1j * np.pi * hz * lag_s * sides))
    return direct + amp(-19) * yard(hits) + sand() + water() + insects() + open_air()


# capsule dip and peak: (frequency [Hz], gain [dB])
CAPSULE = [(6000, -0.71), (7500, 0.5), (10000, -3.5), (10800, -0.5), (11300, 3.5), (16000, -2)]
# colour of the ports: (frequency [Hz], left minus right [dB])
PORT_DIFFERENCE = [(60, 5.5), (150, 1), (380, 1), (950, 0.5), (2380, 4), (5980, -1.5), (15000, 0.0)]
TOP_HZ = 15750


def record(dry):
    """The capsule dips below its treble peak, the ports differ in colour, a steep band limit cuts the top."""
    side = np.array([[.5], [-.5]])

    def response(hz):
        colour = amp(along(CAPSULE, hz) + side * along(PORT_DIFFERENCE, hz))
        return colour / (1 + (hz / TOP_HZ) ** 200)

    return filtered(dry, response)


dry = scene()
out = record(dry)
output_pcm(out)
```